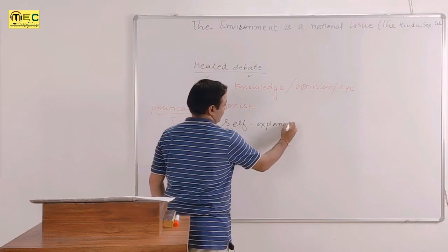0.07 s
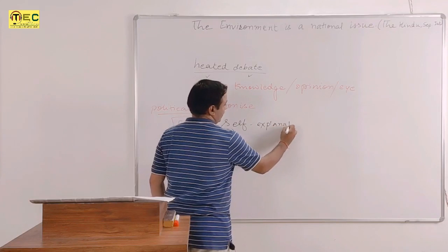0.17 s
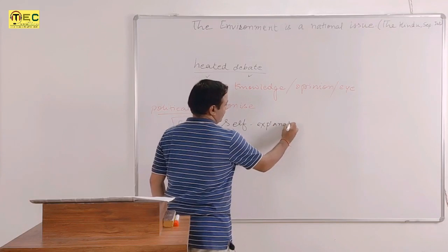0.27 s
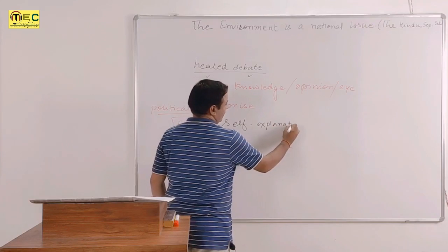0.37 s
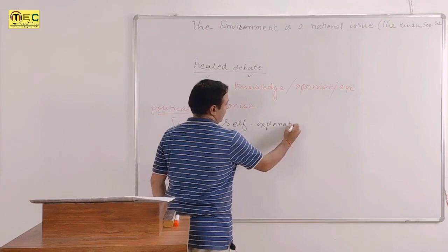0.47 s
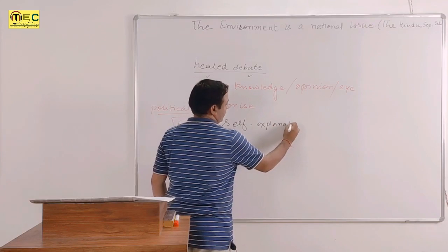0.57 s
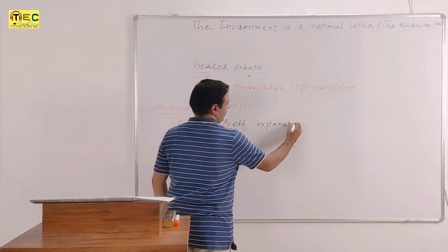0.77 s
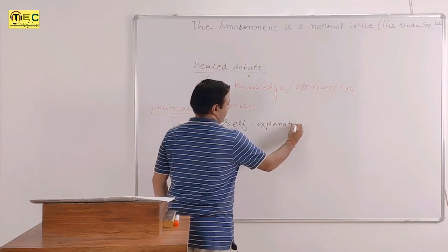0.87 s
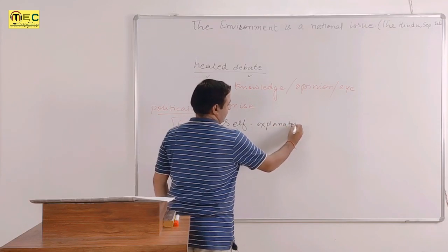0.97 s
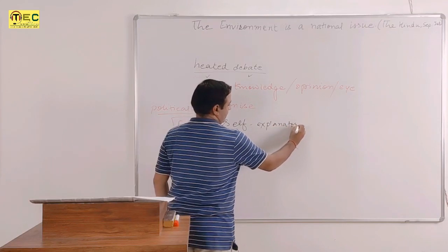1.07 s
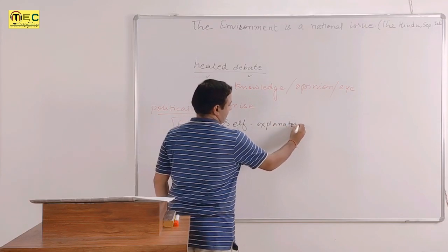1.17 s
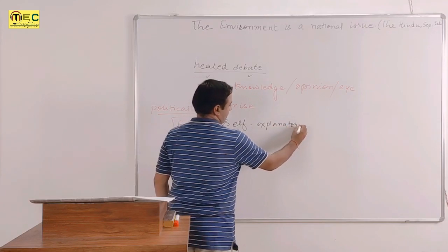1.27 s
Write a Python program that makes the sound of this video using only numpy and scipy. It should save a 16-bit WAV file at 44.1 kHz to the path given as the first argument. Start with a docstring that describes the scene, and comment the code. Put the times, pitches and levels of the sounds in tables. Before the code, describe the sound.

A marker writes on a whiteboard in a quiet classroom. Its tip hits with a click and a hollow knock that briefly rings the board, followed by soft, scratchy strokes and barely audible squeaks.

```python
"""A hollow knock with a sharp tick, then short hissing strokes: a felt marker on a whiteboard.
The pen lands once and judders, ringing the wall-mounted panel, while its nib snaps onto the surface.
The felt's friction hisses, rubs the panel under pressure and squeaks faintly as it sticks and slips.
Under it lies the low rumble of a quiet classroom; a noise suppressor turns the pauses down."""
import sys
import numpy as np
from scipy import signal
from scipy.fft import rfft, irfft, next_fast_len
from scipy.io import wavfile
from scipy.ndimage import uniform_filter1d, map_coordinates

SR = 44100
rng = np.random.default_rng(int(sys.argv[2]) if len(sys.argv) > 2 else 0)


def wav_out(sig):
    """Save sig, one row per channel (or a flat mono array), as 16-bit PCM at SR to the path in sys.argv[1]."""
    wavfile.write(sys.argv[1], SR, np.round(np.clip(np.atleast_2d(sig).T, -1, 1) * 32767).astype(np.int16))


N = 57330
T = np.arange(N) / SR


def amp(db):
    """Decibels to gain."""
    return 10 ** (np.asarray(db) / 20)


def unit(x):
    """Scale to rms 1."""
    return x / np.sqrt(np.mean(x ** 2) + 1e-20)


def filtered(x, response):
    """Equalise x with response, a gain as a function of f/Hz."""
    size = next_fast_len(N + SR // 2)
    hz = np.fft.rfftfreq(size, 1 / SR) + 1
    return irfft(rfft(x, size) * response(hz), size)[:N]


def noise(spectrum, tilt_db=0, bumps=(), shelf_hz=SR):
    """Noise of rms 1: a spectrum with a tilt per octave, narrow bumps (f/Hz, gain/dB) and a top shelf."""
    freqs, levels = np.transpose(spectrum)
    bump_octaves = .16

    def gain(hz):
        base = np.interp(np.log(hz), np.log(freqs), levels)
        tilt = tilt_db * np.log2(np.clip(hz / freqs[-1], 1 / 10, 1))
        lift = sum(db * np.exp(-(np.log2(hz / centre) / bump_octaves) ** 2) for centre, db in bumps)
        shelf = -10 * np.clip((hz - shelf_hz) / 400, 0, 1)  # 10 dB down over 400 Hz
        return amp(base + tilt + lift + shelf)
    return unit(filtered(rng.standard_normal(N), gain))


def wobble(rate):
    """A smooth random curve, rate knots a second."""
    return map_coordinates(rng.standard_normal(N // 10), [T * rate])


def swell(peak, rise, fall):
    """A rounded attack and a steepening decay, 20 dB down after the fall time."""
    attack = ((peak - T) / rise) ** 2 / 2
    decay = (abs(T - peak) / fall) ** 1.35
    return amp(-20 * np.where(T < peak, attack, decay))


def ring(modes, start):
    """Damped modes struck at the start time."""
    age = np.maximum(T - start, 0)
    return sum(amp(db) * 10 ** (-3 * age / t60) * np.sin(2 * np.pi * hz * age) for hz, db, t60 in modes)


def room_tone():
    """The bed: steady air, a soft low-mid rustle and heaves of rumble."""
    # colour of each layer: f/Hz, relative level/dB
    air_spectrum = [(12, -33), (20, 1.5), (168, -10.5), (310, -11), (607, -11.5), (738, -18), (1220, -19),
                    (1530, -20.5), (2820, -26.5), (4420, -30), (6180, -24.5), (14700, -39.5), (16000, -39)]
    rustle_spectrum = [(80, -37.5), (280, 1), (550, -8), (780, -16), (1050, -12.5), (1500, -34.5),
                       (5000, -18.5), (14000, -32)]
    rumble_spectrum = [(15, -6.5), (24, 3.5), (35, -1.5), (50, -11), (70, -7), (110, -15.5), (155, -18.5),
                       (260, -25), (700, -41), (3000, -106)]
    # fader curve of the rustle: t/s, level/dB
    rustle_levels = [(0, -101), (.4, -74.5), (.65, -71), (.84, -88.5), (.92, -102), (.98, -66.5),
                     (1.04, -76), (1.17, -67.5), (1.22, -68.5), (1.3, -72.5)]
    # swells of the rumble: peak t/s, rise/s, fall/s, level/dB
    heaves = [(0.052, 0.012, 0.068, -62), (.14, 0.034, 0.041, -53.5), (0.243, 0.019, 0.12, -45.5),
              (0.297, 0.0071, 0.015, -45.5), (.54, 0.047, 0.016, -63), (1.073, 0.019, 0.15, -56),
              (1.148, 0.053, 0.99, -58.5)]
    rumble = sum(amp(db) * swell(t, rise, fall) * noise(rumble_spectrum) for t, rise, fall, db in heaves)
    air = amp(-67) * noise(air_spectrum)
    rustle = amp(np.interp(T, *np.transpose(rustle_levels))) * noise(rustle_spectrum)
    return air + rustle + rumble


def walls(send, t60_s=.22, predelay_s=.004):
    """The classroom's walls answer with a short, diffuse tail."""
    tail = rng.standard_normal(N) * amp(-60 * T / t60_s) * (T > predelay_s)
    return signal.fftconvolve(send, tail / np.linalg.norm(tail))[:N]


def felt_squeaks(waver_hz=6, fuzz_gain=0.7):
    """Weak stick-slip: a nearly steady tone in a narrow band of noise."""
    # faint squeaks: peak t/s, rise/s, fall/s, level/dB, f/Hz
    squeaks = [(0.029, 0.0038, .015, -66, 15480), (.06, 0.076, 0.35, -74.5, 1172),
               (0.213, 0.069, 0.11, -63, 899), (.22, 0.027, 0.025, -73.5, 1217),
               (.69, 0.082, 0.099, -68.5, 897), (1.063, 0.022, 0.18, -64, 1098),
               (1.095, 0.0089, 0.053, -60.5, 1196), (1.177, 0.06, 0.074, -63.5, 905)]
    out = np.zeros(N)
    for t, rise, fall, db, hz in squeaks:
        phase = 2 * np.pi * np.cumsum(hz + waver_hz * wobble(rate=120)) / SR
        fuzz = wobble(rate=300) * np.sin(phase) + wobble(rate=300) * np.cos(phase)
        out += amp(db) * swell(t, rise, fall) * (np.sin(phase) + fuzz_gain * fuzz)
    return out


def pen_taps():
    """Light touches of the pen ring the board's face with a short tock, its pitch set by the spot."""
    # touches: t/s, level/dB, pitch ratio
    taps = [(0.2305, -60.5, 2.1), (0.3113, -52.5, 1.011), (0.568, -51.5, 0.94), (1.288, -56, 1.28)]
    # modes of the face: f/Hz, level/dB, t60/s
    face_modes = [(1067, -11.5, 0.027), (1799, -2.5, 0.024), (3110, -8, 0.018)]
    out = np.zeros(N)
    for t, db, pitch in taps:
        spot_modes = [(hz * pitch, level, t60) for hz, level, t60 in face_modes]
        out += amp(db) * ring(spot_modes, t)
    return out


def nib_snaps(low_cut_hz=2400):
    """The nib snaps onto the board with a fine crack and rings the pen for a moment."""
    # snaps: t/s, crack level/dB, ring level/dB
    snaps = [(0.0287, -58.5, -72), (0.039, -63, -76), (0.2457, -40, -32), (0.2479, -36.5, -41.5)]
    # colour of the crack: f/Hz, relative level/dB
    crack_spectrum = [(3500, -30), (5600, -1), (11500, 0), (12500, -11), (15500, -8)]
    # modes of the pen: f/Hz, level/dB, t60/s
    pen_modes = [(2950, -6.5, 0.015), (4390, -19, 0.021), (7420, 5, 0.0036), (8400, -12, 0.015),
                 (10900, -12, 0.0027)]
    out = np.zeros(N)
    for t, crack_db, ring_db in snaps:
        crack = amp(crack_db) * swell(t, rise=.0003, fall=.0015) * noise(crack_spectrum)
        out += crack + amp(ring_db) * ring(pen_modes, t)
    return filtered(out, lambda hz: 1 - 1 / (1 + (hz / low_cut_hz) ** 12))


def panel_knock(attack_s=0.0043, low_hz=212, high_hz=660):
    """The pen lands and judders; every contact rings the same panel modes, heard as a hollow band."""
    # the landing and its rebounds: t/s, level/dB
    contacts = [(0.208, -27), (0.225, -41), (0.2442, -35.5), (0.2962, -42), (0.3376, -49.5)]
    # modes of the panel: f/Hz, level/dB, t60/s
    panel_modes = [(259.2, -13.5, 0.44), (312.2, 0.6, 0.24), (351.3, 7, 0.068), (367.6, -22.5, 0.66),
                   (388.6, -5.5, 0.2), (508.4, -21, 0.34), (566, -10, 0.11)]
    out = np.zeros(N)
    for t, db in contacts:
        attack = 1 - np.exp(-(np.maximum(T - t, 0) / attack_s) ** 2)
        out += amp(db) * ring(panel_modes, t) * attack
    return filtered(out, lambda hz: 1 / (1 + (low_hz / hz) ** 8 + (hz / high_hz) ** 8))


def felt_strokes(grain_db=2.2, hollow_db=-6.5, ripple_db=3, ripple_spacing_hz=70.38):
    """Grainy friction: the felt hisses, and under pressure the panel joins in with a rub."""
    # hiss of each stroke and its EQ: peak t/s, rise/s, fall/s, level/dB, tilt/(dB per octave),
    # lift f/Hz, lift/dB, hollow f/Hz, top shelf f/Hz, above which the hiss is turned down 10 dB
    strokes = [(0.04, 0.011, 0.091, -62, 8, 8450, 9, 7340, 9400),
               (0.243, 0.019, 0.074, -55, -0.5, 8200, 3.5, 4400, 15000),
               (0.307, 0.03, 0.085, -66, 6.5, 5730, 7.5, 8000, 15200),
               (0.494, 0.025, 0.062, -59, 11, 8250, 6.5, 11400, 15000),
               (0.663, 0.029, 0.051, -54.5, -0.5, 7400, 1, 8550, 12100),
               (0.761, 0.045, 0.054, -57.5, -0.5, 5720, 6, 8500, 11700),
               (0.818, 0.046, 0.057, -61, -5, 7100, 2.5, 9500, 11900),
               (0.857, 0.092, 0.038, -66.5, -9, 5600, 15, 7900, 7140),
               (0.938, 0.0051, 0.11, -61.5, -3.5, 6050, 7, 11200, 9500),
               (1.029, 0.011, 0.036, -72, 11, 10100, 8, 8900, 11900),
               (1.29, 0.029, 0.042, -63.5, -2, 6700, 0, 5200, 12000)]
    # drags hard enough to stir the panel: peak t/s, rise/s, fall/s, level/dB
    drags = [(0.498, 0.065, 0.16, -69.5), (0.589, 0.036, 0.19, -65.5), (0.691, 0.051, 0.088, -58),
             (0.742, 0.015, 0.051, -64), (0.858, 0.036, 0.052, -60), (0.959, 0.0083, 0.032, -68),
             (1.1, 0.027, 0.052, -73), (1.29, 0.059, 0.05, -72.5)]
    # colours of hiss and rub: f/Hz, relative level/dB
    hiss_spectrum = [(300, -29.5), (2400, -18), (3100, -3.5), (4600, -12.5), (5400, 2), (7500, 0.5),
                     (8300, -4.5), (11800, -12.5), (12600, -14), (15500, -22)]
    rub_spectrum = [(100, -1.5), (300, -13), (560, 3.5), (800, -19), (900, -0.5), (1350, 1), (1800, 3.5),
                    (2080, -1.5), (2850, -10), (3080, 3.5), (3700, -8.5), (6000, -10.5), (14000, -67)]
    grain = unit(amp(grain_db * wobble(rate=400)))
    hiss = np.zeros(N)
    for t, rise, fall, db, tilt_db, lift_hz, lift_db, hollow_hz, shelf_hz in strokes:
        bumps = [(lift_hz, lift_db), (hollow_hz, hollow_db)]
        hiss += amp(db) * swell(t, rise, fall) * noise(hiss_spectrum, tilt_db, bumps, shelf_hz)
    rub = sum(amp(db) * swell(t, rise, fall) * noise(rub_spectrum) for t, rise, fall, db in drags)
    ripple = rng.standard_normal(N // 10)  # the board's dense resonances colour hiss and rub alike

    def board_response(hz):
        return unit(amp(ripple_db * map_coordinates(ripple, [hz / ripple_spacing_hz])))
    return filtered(grain * (hiss + rub), board_response)


def scene():
    """Pen and board with their reflections, over the room tone, in mono."""
    writing = felt_strokes() + felt_squeaks() + pen_taps()
    snaps = nib_snaps()
    knock = panel_knock()
    reverb_send = amp(-11) * writing + amp(-20) * (snaps + knock)
    return (writing + snaps + knock + walls(reverb_send) + room_tone())[None]


def record(dry):
    """A noise suppressor, keyed above the rumble, ducks the pauses; a steep high cut trims the top."""
    threshold_db, window_s, floor_gain = -66, 0.016, 0.11
    high_cut_hz, transition_hz = 15750, 700
    sidechain = filtered(dry[0], lambda hz: hz > 200)
    power = abs(uniform_filter1d(sidechain ** 2, int(window_s * SR)))
    opening = power / (power + amp(threshold_db) ** 2)
    ducked = dry[0] * (floor_gain + (1 - floor_gain) * opening)
    return filtered(ducked, lambda hz: np.clip(1 / 2 + (high_cut_hz - hz) / transition_hz, 0, 1))[None]


dry = scene()
out = record(dry)
wav_out(out)
```